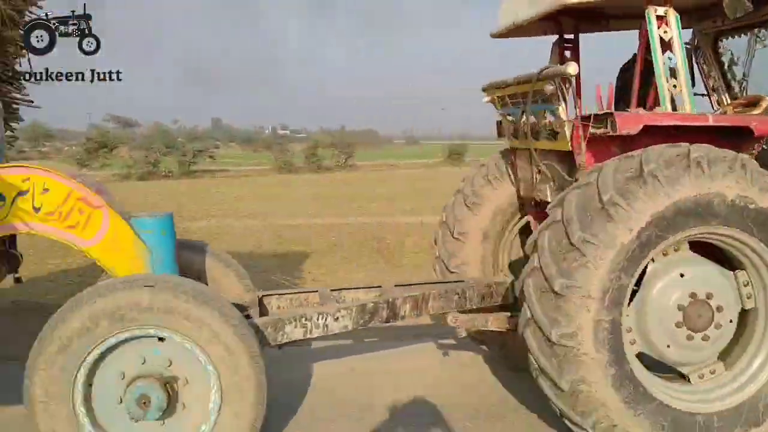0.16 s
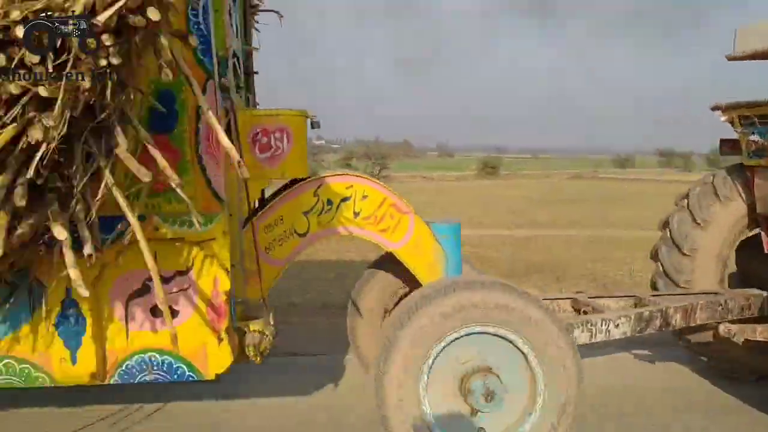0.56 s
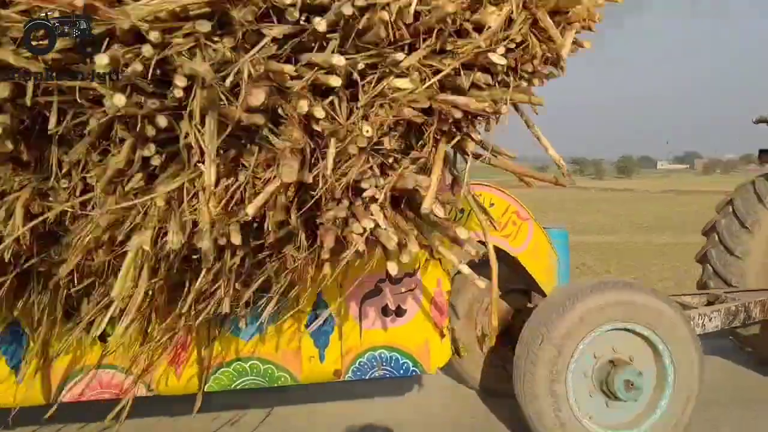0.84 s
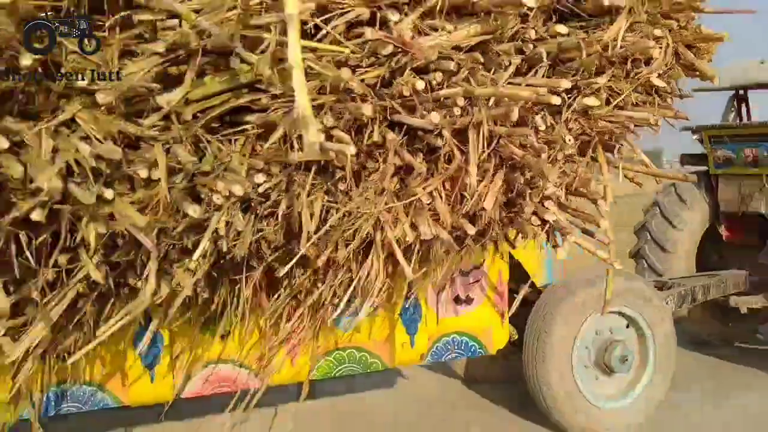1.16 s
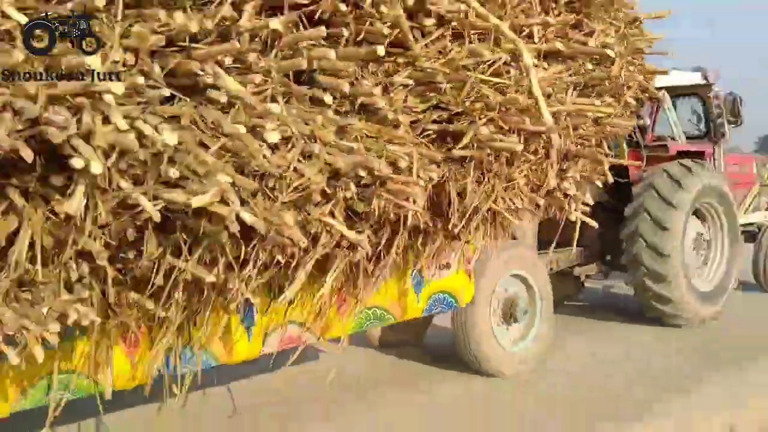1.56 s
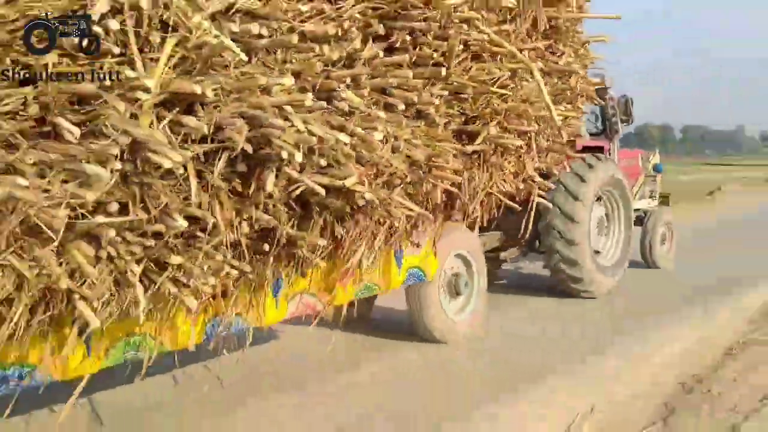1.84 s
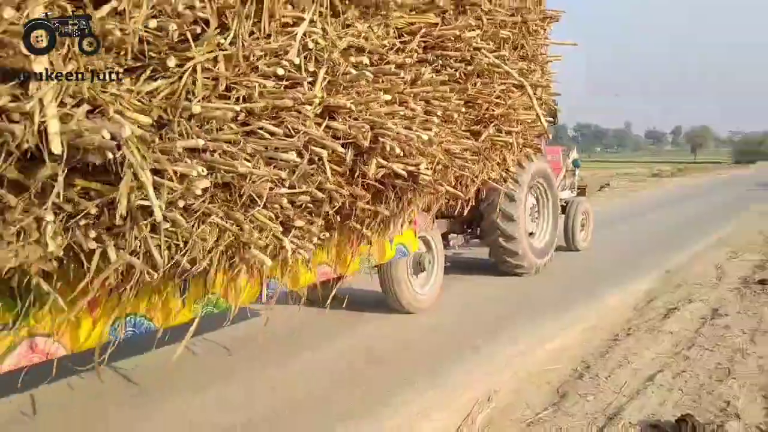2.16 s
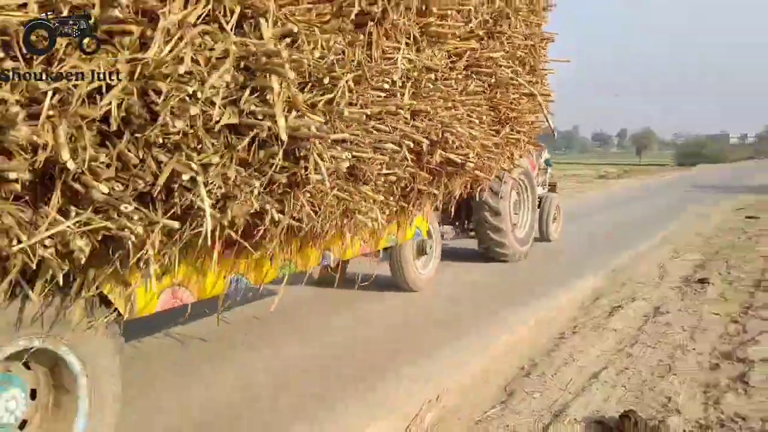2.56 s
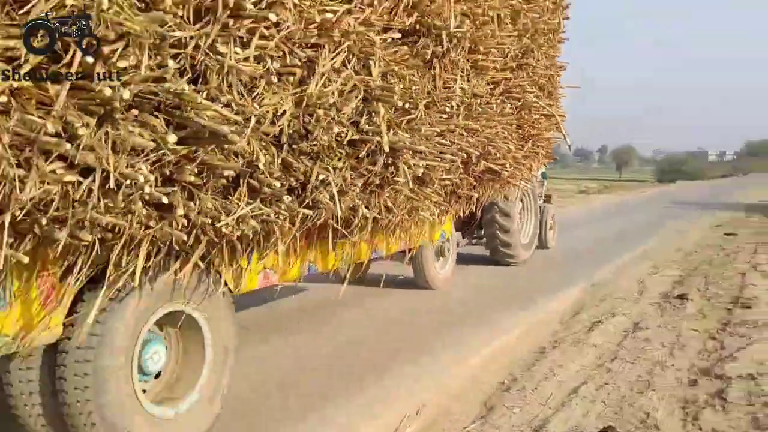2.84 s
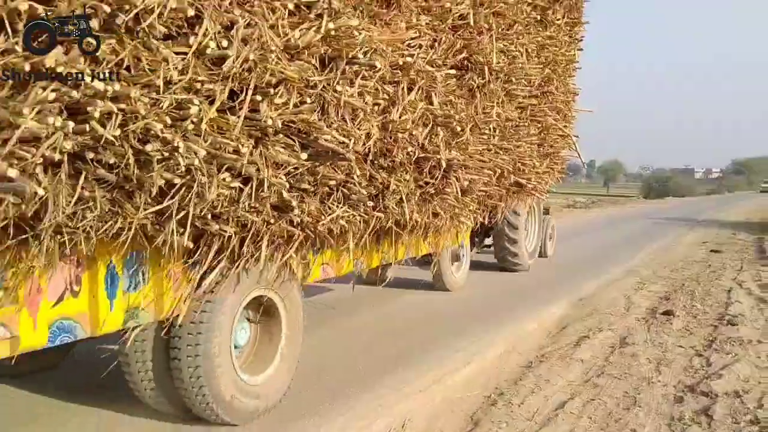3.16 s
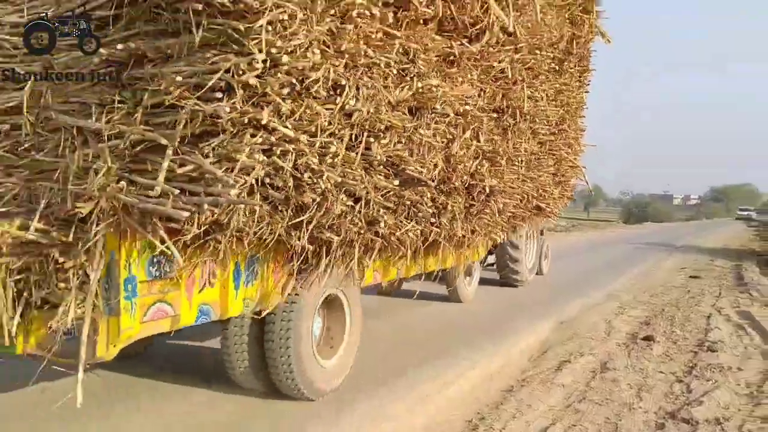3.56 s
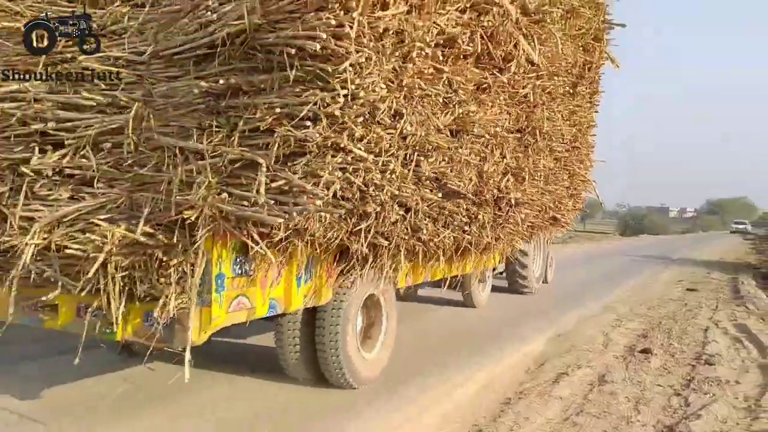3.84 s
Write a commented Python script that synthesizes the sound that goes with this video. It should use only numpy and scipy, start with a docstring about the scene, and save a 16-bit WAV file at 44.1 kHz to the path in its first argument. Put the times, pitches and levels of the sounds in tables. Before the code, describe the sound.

A diesel tractor pulling a loaded trailer roars close to a phone outdoors, gears whining; the driver lifts off, hitch and load clatter, the engine sinks and fades, and a dry rattle quickens close by at the end.

```python
"""A four-cylinder diesel tractor pulls a loaded trailer past a phone on a country road.
The driver lifts off, the hitch and load clatter, the engine drops away, with a short swell near the end,
where a dry rattle speeds up close by.
The engine is harmonics of its cycle plus block noise pulsed by the firings; gears whine as wavering sines.
The clatter is noise grains exciting damped steel modes; the rattle is a quickening train of ringing taps."""
import sys
import numpy as np
from scipy import signal
from scipy.fft import rfft, irfft
from scipy.io import wavfile
from scipy.ndimage import uniform_filter1d

SR = 44100
rng = np.random.default_rng(int(sys.argv[2]) if len(sys.argv) > 2 else 0)


def volts_from_decibels(level):
    """Turn decibel levels (scalar or array-like) into linear amplitude factors."""
    exponent = np.asarray(level, float) / 20
    return 10 ** exponent


def to_wav(sig):
    """Store sig (one row per channel, or 1-D mono) as 16-bit WAV at the path in sys.argv[1].

    Samples outside -1..1 are clipped; the rate is SR.
    """
    pcm = np.clip(np.atleast_2d(sig), -1, 1) * 32767
    pcm = np.round(pcm).astype(np.int16)
    wavfile.write(sys.argv[1], SR, pcm.T)  # frames by channels


N = 176400
TIME = np.arange(N) / SR  # s

# Engine speed. Each row: time in seconds, engine cycles per second in Hz.
SPEED = [(0, 20.4), (.2, 20.4), (.3, 20.2), (.62, 20.15), (.75, 20.5), (1.07, 20.5), (1.15, 20.2),
         (1.25, 19.2), (1.5, 17.7), (1.7, 16.5), (2.2, 14.6), (2.8, 14), (3.3, 11.3), (4, 11)]


def evened(x):
    """Normalization: scales a signal to unit rms."""
    return x / np.sqrt(np.mean(x ** 2) + 1e-20)


def along(table):
    """Linear interpolation: turns each column after the time into a curve over the scene."""
    rows = np.array(table, float)
    return [np.interp(TIME, rows[:, 0], column) for column in rows.T[1:]]


def read(points, hz):
    """Interpolation of a spectrum along a logarithmic frequency axis."""
    f, value = np.transpose(points)
    return np.interp(np.log(hz + 1), np.log(f + 1), value)


def colour(x, points):
    """Linear filtering: multiplies the spectrum by a gain curve in dB."""
    gain = volts_from_decibels(read(points, np.fft.rfftfreq(len(x), 1 / SR)))
    return irfft(rfft(x) * gain, len(x))


def slow(hz):
    """Random modulation: zero-mean noise, low-passed around hz, of unit rms."""
    f = np.fft.rfftfreq(N, 1 / SR)
    lowpass = (f > 0) / (1 + (f / hz) ** 2)
    return evened(irfft(rfft(rng.standard_normal(N)) * lowpass, N))


def resonate(x, hz, width_hz):
    """Damped resonance: shifts hz down to zero, smooths with one pole, and shifts back up."""
    turn = np.exp(2j * np.pi * np.cumsum(hz * np.ones(len(x))) / SR)
    pole = np.exp(-np.pi * width_hz / SR)
    return 2 * (turn * signal.lfilter([1 - pole], [1, -pole], x / turn)).real


def tone(hz, db, waver_hz, waver_db):
    """Frequency and amplitude modulation: a sine that wavers in pitch and strength."""
    level = np.sqrt(2) * volts_from_decibels(db + waver_db * slow(7.6))
    turns = np.cumsum(hz + waver_hz * slow(14.1)) / SR
    return level * np.sin(2 * np.pi * (turns + rng.random()))


def beats(turns, spread_db, peak_s):
    """Pulse train: each whole turn starts a pulse of random size that peaks after peak_s and dies away."""
    at = np.diff(np.floor(turns), prepend=np.floor(turns[0])) > 0
    size = volts_from_decibels(spread_db * rng.standard_normal(1000))[np.cumsum(at) % 1000]
    t = np.arange(2000) / SR
    pulse = t / peak_s * np.exp(1 - t / peak_s)
    return signal.oaconvolve(at * size, pulse)[:N]


def exhaust(cycles, tones_db):
    """Periodic pulsation: harmonics of the engine cycle, and a firing tone that dies with the load."""
    # Each row: multiple of the cycle, level relative to the other harmonics in dB.
    harmonics = [(6, -0.5), (8, 2.5), (9, -7.5), (11, -5), (12, 5.5), (13, 0), (15, -3), (16, -6.5),
                 (18, 3), (36, -2), (39, -6.5)]
    # The firing tone, four to a cycle. Each row: time in seconds, rms level in dB.
    firing = [(0, -34), (.3, -39), (.67, -33), (1.12, -35.5), (1.2, -39), (1.4, -70), (4, -61)]
    tones = 0
    for k, db in harmonics:
        level = volts_from_decibels(db + 2.24 * slow(4.3))
        tones = tones + level * np.sin(2 * np.pi * (k * cycles + rng.random()))
    firing_tone = np.sqrt(2) * volts_from_decibels(along(firing)[0]) * np.sin(8 * np.pi * cycles)
    return volts_from_decibels(tones_db) * evened(tones) + firing_tone


def block_noise(cycles, bands_db):
    """Amplitude-modulated noise: three bands of engine noise, knocked by each firing."""
    # Spectrum when near, and when far. Each row: frequency in Hz, relative level in dB.
    near = [(15, -21), (60, -18), (100, -11.5), (200, -7.5), (360, -13), (430, -14.5), (560, -8.5),
            (720, 0), (1050, -2.5), (1200, -4), (1600, 1), (1900, -3), (2350, 1.5), (2700, -4),
            (3100, -14.5), (4200, -15.5), (5900, -21), (7000, -21), (8300, -15), (9200, -22), (11000, -28),
            (15500, -29)]
    far_off = [(15, -55), (60, -27), (90, 6.5), (130, 7), (190, 3.5), (350, -4), (420, -12.5), (620, -3.5),
               (950, -4), (1250, -8.5), (1600, -5), (2250, -9.5), (2900, -20.5), (3300, -25), (4300, -23.5),
               (5200, -31), (6700, -36.5), (8400, -31.5), (10500, -39.5), (15500, -47.5)]
    turn_s, turn_length_s = 1.58, 0.9  # middle and length of the passage from near to far
    split_hz = 441, 2916
    knock_share, shake_dbs = (0.2, 0.16, 0.23), (.7, .8, 1.1)  # rumble, roar, hiss

    knock = evened(beats(4 * cycles, 1, 0.0047))
    f, t, z = signal.stft(rng.standard_normal(N), SR, nperseg=2048, noverlap=1536)
    far = np.clip((t - turn_s) / turn_length_s + .5, 0, 1)

    # uneven spectrum: patches broad in frequency, streaks narrow in frequency but longer in time
    patches = uniform_filter1d(uniform_filter1d(rng.standard_normal(z.shape), 12, 0), 6, 1)
    streaks = uniform_filter1d(uniform_filter1d(rng.standard_normal(z.shape), 2, 0), 10, 1)
    spectrum_db = np.outer(read(near, f), 1 - far) + np.outer(read(far_off, f), far)
    spectrum_db = spectrum_db + (0.88 + 0.73 * far) * evened(patches) + 1.24 * evened(streaks)
    z = z * volts_from_decibels(spectrum_db)

    # with distance the rumble also pulses once a cycle
    chug_share = 0.23 * np.interp(TIME, t, far)
    chug = evened(beats(cycles + 0.37, 1.2, 0.029))
    rumble_db, roar_db, hiss_db = bands_db
    rumble_db = rumble_db + 20 * np.log10(1 - chug_share + chug_share * chug)

    low, high = [1 / (1 + (f / edge) ** 8) for edge in split_hz]
    parts, levels = (low, high - low, 1 - high), (rumble_db, roar_db, hiss_db)
    out, shake = np.zeros(N), slow(17)
    for part, db, share, shake_db in zip(parts, levels, knock_share, shake_dbs):
        x = signal.istft(z * np.sqrt(part)[:, None], SR, nperseg=2048, noverlap=1536)[1][:N]
        x = x / np.sqrt(uniform_filter1d(x ** 2, size=16000))  # steady running rms
        out = out + volts_from_decibels(db + shake_db * shake) * x * evened(1 - share + share * knock)
    return out


def engine():
    """Common periodicity: one slightly unsteady cycle drives the exhaust tones and the block noise."""
    # Levels as the engine fades, with a short swell near the end. Each row: time in seconds,
    # then rumble, roar, hiss and exhaust tones in dB.
    engine_levels = [(0, -34, -16.5, -25.5, -25.5), (.2, -29.5, -19, -27, -28), (.45, -30, -20, -27, -27),
                     (.66, -30.5, -19.5, -29.5, -30), (.72, -28.5, -20, -31.5, -31),
                     (1, -34.5, -21.5, -32, -24.5), (1.15, -27.5, -23, -33.5, -28.5),
                     (1.25, -28, -22, -33, -31.5), (1.42, -30.5, -23.5, -35, -34),
                     (1.765, -29.5, -26, -32, -34), (1.82, -31.5, -27, -37.5, -41),
                     (2.1, -36, -31.5, -42.5, -36.5), (2.33, -37, -35.5, -47, -52),
                     (2.5, -35.5, -34, -48.5, -53), (2.65, -38.5, -37.5, -46.5, -43),
                     (3, -43, -41, -51, -44), (3.3, -43.5, -44.5, -51, -47), (3.52, -42, -44.5, -53.5, -50),
                     (3.8, -35, -35.5, -44, -37), (4, -43, -39.5, -50, -54)]
    *bands_db, tones_db = along(engine_levels)
    cycles = np.cumsum(along(SPEED)[0] * (1 + 0.0013 * slow(5.8))) / SR
    return exhaust(cycles, tones_db) + block_noise(cycles, bands_db)


def whines():
    """Tooth-meshing tones: gear teeth sing under load; another pair takes over while coasting."""
    # Under load. Each row: time in seconds, fundamental in Hz, levels of multiples 1 to 5 in dB.
    gears = [(0, 530, -38, -26, -45, -34, -23.5), (.15, 533, -29, -21.5, -27, -40, -42),
             (.21, 527.8, -32, -38, -19, -34, -41), (.36, 528, -33.5, -33.5, -23.5, -26.5, -45),
             (.45, 529.4, -41, -25, -28, -31, -35), (.58, 523, -30.5, -28, -27, -30, -25),
             (.66, 529.4, -40, -39, -24.5, -31, -45), (.8, 539.4, -27.5, -34, -21, -40, -33),
             (.92, 531.5, -28, -28.5, -24.5, -35, -29.5), (1.1, 530.4, -31.5, -33.5, -24, -27, -33),
             (1.17, 524, -34, -32, -44, -34, -29), (1.25, 512, -40, -36, -50, -46, -39)]
    # While coasting. Each row: time in seconds, frequency in Hz, level in dB.
    coast = [(1.13, 715, -50), (1.18, 708, -27), (1.3, 674, -28.5), (1.42, 646, -29), (1.52, 626, -29),
             (1.58, 615, -50)]
    hz, *levels = along(gears)
    load = sum(tone(k * hz, db, 1.5 * k, 1.1) for k, db in enumerate(levels, 1))
    stop = np.clip((gears[-1][0] - TIME) / 0.034, 0, 1)  # fade-out over 34 ms
    hz, db = along(coast)
    on = (TIME > coast[0][0]) & (TIME < coast[-1][0])
    return stop * (load + housing()) + on * tone(hz, db, 1, .5)


def housing():
    """Resonance: noise through a narrow housing mode gives a fuzzy note that throbs with the firings."""
    # Each row: time in seconds, level in dB.
    swell = [(0, -62), (.18, -30), (.35, -21.5), (.55, -25), (.7, -27), (1.1, -38), (1.2, -62), (4, -70)]
    throb = 1 + 1.6 * np.cos(8 * np.pi * np.cumsum(along(SPEED)[0]) / SR)
    note = resonate(rng.standard_normal(N), 2334, 36)
    return volts_from_decibels(along(swell)[0]) * evened(throb * note)


def clank(t60, thud_db):
    """Impact excitation: a crunch of grains, a thud and a few damped steel modes."""
    # Spectrum of the crunch. Each row: frequency in Hz, relative spectral density in dB per Hz.
    crunch_spectrum = [(180, -25), (300, 0.5), (453, -22), (641, -6.5), (732, -5), (938, -0.5), (1330, -7),
                       (2480, -1), (3630, -20.5), (8430, -22.5), (15500, -46)]
    # Steel modes. Each row: frequency in Hz, relative level in dB, time to fall by 60 dB in seconds.
    steel = [(240, -39, 0.23), (556, -16, 0.14), (970, -5, 0.78), (1580, 4.5, 0.31), (2250, -7, 1),
             (2450, -12, 0.083), (2750, -19, 0.16), (4530, -3, 0.3)]
    ring_db = -14  # all modes, against the crunch
    t = np.arange(SR // 2) / SR
    # noise whose level changes at random every 50 samples
    grain_db = rng.exponential(1, len(t) // 50 + 1).repeat(50)[:len(t)]
    grains = rng.standard_normal(len(t)) * volts_from_decibels(grain_db)
    thud = evened(resonate(resonate(rng.standard_normal(len(t)), 150, 220), 215, 220))
    ring = 0
    for hz, mode_db, ring_s in steel:
        a, b = rng.standard_normal(2)  # each strike varies the mode's level and pitch
        mode = evened(resonate(grains, hz * (1 + 0.03 * b), 30 + 0.032 * hz))
        ring = ring + volts_from_decibels(mode_db + 3.0 * a - 60 * t / ring_s) * mode
    crunch = volts_from_decibels(-60 * t / t60) * (evened(colour(grains, crunch_spectrum)) + volts_from_decibels(thud_db) * thud)
    rise = np.minimum(t / .007, 1)
    return rise * (crunch + volts_from_decibels(ring_db) * ring)


def narrow_note(length_s, hz):
    """Narrow-band noise: a resonator's squeak, ring or hum, swelling and fading."""
    u = np.arange(round(length_s * SR)) / SR
    swell = np.sqrt(np.sin(np.pi * u / length_s))
    return swell * evened(resonate(rng.standard_normal(len(u)), hz, .008 * hz))


def clatter():
    """Superposition: clanks of hitch and load, squeaks, rings and one longer low hum add together."""
    # Each row: start in seconds, level in dB, time for the crunch to fall by 60 dB in seconds,
    # weight of the low thud in dB.
    clanks = [(1.452, -15.5, 0.43, -16), (1.49, -22.5, 0.36, -9), (1.553, -18.5, 0.62, -6),
              (1.586, -21, 0.36, -4), (1.619, -21.5, 0.26, -10), (1.665, -24.5, 0.21, -25),
              (1.707, -22.5, 0.23, -20), (1.745, -24.5, 0.2, -20), (2.422, -40, 0.11, 4),
              (2.48, -40, 0.37, -8), (3.099, -54, 0.057, 24.5), (3.235, -51, .08, -2)]
    # Squeaks, rings and one longer low hum. Each row: start in seconds, length in seconds,
    # frequency in Hz, level in dB.
    narrow_notes = [(1.575, .025, 10050, -38), (1.666, .025, 10000, -35), (1.668, .025, 6200, -42),
                    (1.585, .04, 2070, -21), (1.67, .025, 3330, -31), (2.46, .07, 950, -37),
                    (3.76, .045, 890, -36), (.74, .2, 3960, -41), (1.555, .06, 570, -27),
                    (2.47, .06, 600, -38), (1.452, .045, 2550, -20), (1.47, .07, 1550, -25),
                    (1.56, .06, 235, -26), (2.8, .75, 365, -50)]
    out = np.zeros(N + SR)
    for s, db, t60, thud_db in clanks:
        sound = clank(t60, thud_db)
        out[round(s * SR):][:len(sound)] += volts_from_decibels(db) * sound
    for s, length_s, hz, db in narrow_notes:
        sound = narrow_note(length_s, hz)
        out[round(s * SR):][:len(sound)] += volts_from_decibels(db) * sound
    return out[:N]


def rattle():
    """Repeated impact: quickening taps, each a noise puff with three short rings, over a duller rasp."""
    # Each row: time in seconds, level in dB, main resonance in Hz, upper resonance in Hz,
    # share of steady rasp.
    taps_table = [(3.55, -31, 2750, 3260, 0.17), (3.575, -32.5, 3270, 3640, 0.34),
                  (3.6, -29.5, 2820, 3880, 0.33), (3.62, -35, 2186, 3750, 0.34),
                  (3.64, -29, 2570, 3615, 0.26), (3.675, -32, 2140, 3530, 0.43),
                  (3.71, -26.5, 2550, 3730, 0.13), (3.73, -30, 2010, 3700, 0.17),
                  (3.763, -24.5, 2020, 3790, .15), (3.8, -24.5, 2250, 3600, 0.22),
                  (3.83, -27, 2350, 4300, 0.2), (3.862, -27, 2350, 3950, 0.45),
                  (3.887, -26, 2000, 4100, 0.17), (3.92, -29.5, 2334, 4000, 0.6),
                  (3.96, -34.5, 2910, 4050, 0.46), (3.99, -40, 2700, 4100, 0.34)]
    # Spectrum of the noise. Each row: frequency in Hz, relative level in dB.
    body = [(60, -30), (180, -10), (400, -3), (900, -8.5), (1300, 0), (2000, 3.5), (3000, 3), (4500, -8.5),
            (5200, -24), (6500, -15.5), (8000, -17), (10000, -22), (15500, -26)]
    start_s, end_s = 3.5512, 3.965  # no new taps after the end; the rasp goes on
    rate_hz, quickening_hz_per_s = 45.0, 68.4
    tap_s, ring_s = .0018, .0018  # time to the peak of each pulse
    ring_shares = .68, .31, .35

    db, main_hz, upper_hz, rasp = along(taps_table)
    t = np.clip(TIME - start_s, -.001, end_s - start_s)
    turns = rate_hz * t + quickening_hz_per_s * t ** 2 / 2
    taps = beats(turns, 1.4, tap_s)
    tail = .33 * signal.lfilter([.004], [1, -.996], taps)
    fill = tail + rasp * (t > 0)
    lowpass = signal.butter(2, 4800, fs=SR, output="sos")
    dull = signal.sosfilt(lowpass, rng.standard_normal(N))
    x = evened(colour(rng.standard_normal(N) * taps + 1.46 * dull * fill, body))

    # each tap detunes its three rings at random
    stray = 1 + 0.036 * rng.standard_normal((60, 3))[np.floor(turns).astype(int) % 60].T
    for hz, share, detune in zip((main_hz, upper_hz, 1.1 * main_hz), ring_shares, stray):
        sine = np.sin(2 * np.pi * np.cumsum(hz * detune) / SR)
        x = x + share * evened(beats(turns, 1.2, ring_s) * sine)
    return volts_from_decibels(db) * x / np.sqrt(np.mean(x[t > 0] ** 2))


def scene():
    """Superposition of all sources in one channel."""
    return (engine() + whines() + clatter() + rattle())[None]


def roll_off(x):
    """The treble ends steeply here."""
    return signal.sosfilt(signal.butter(12, 15680, fs=SR, output="sos"), x)


def record(dry):
    """High-pass filtering: the phone cuts the deep bass, below 71 Hz."""
    highpass = signal.butter(2, 71, "high", fs=SR, output="sos")
    mix = signal.sosfilt(highpass, dry)
    return roll_off(mix)


dry = scene()
out = record(dry)
to_wav(out)
```